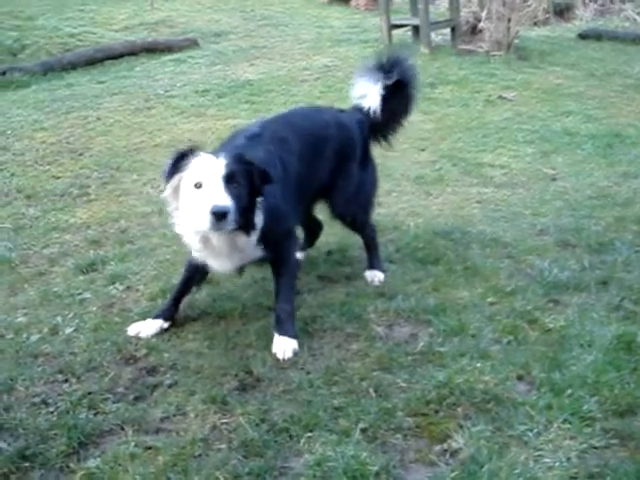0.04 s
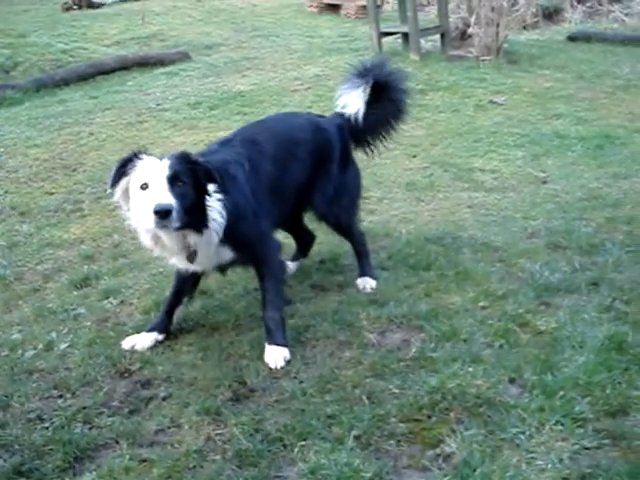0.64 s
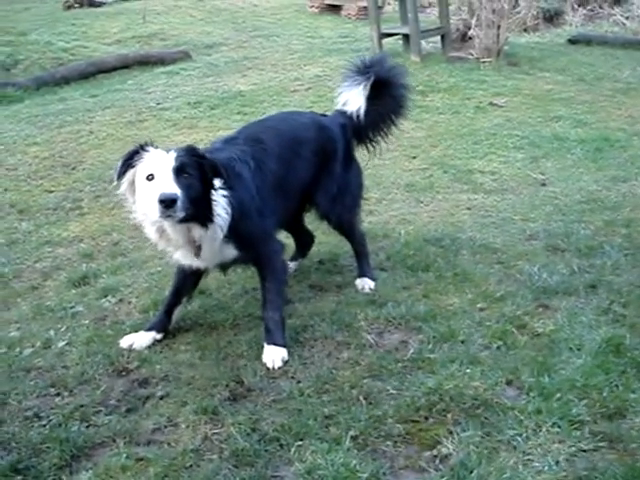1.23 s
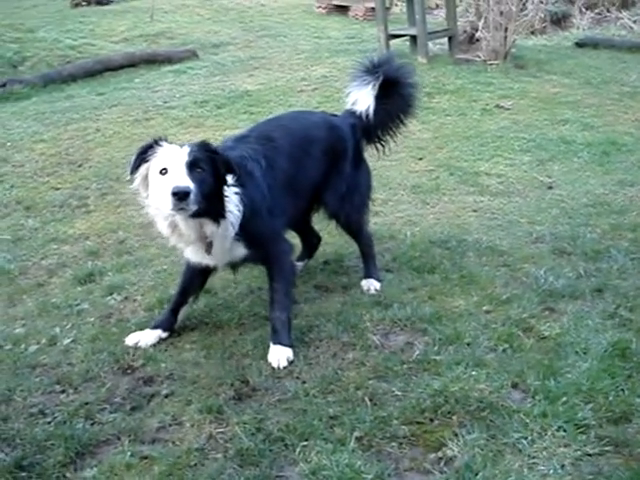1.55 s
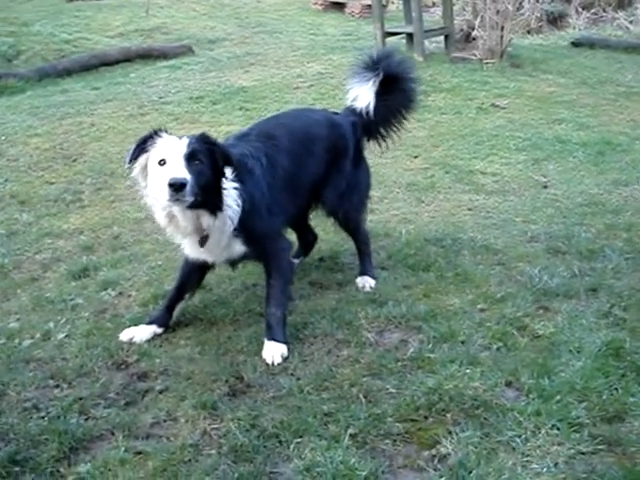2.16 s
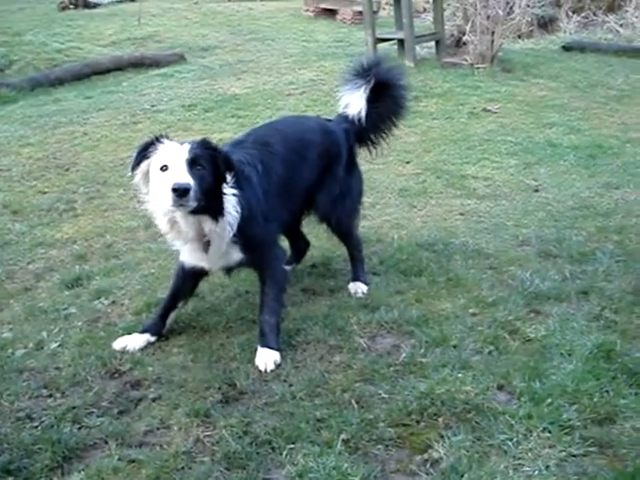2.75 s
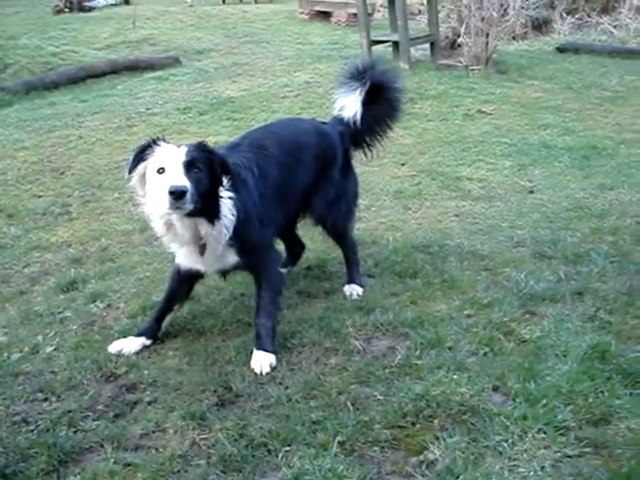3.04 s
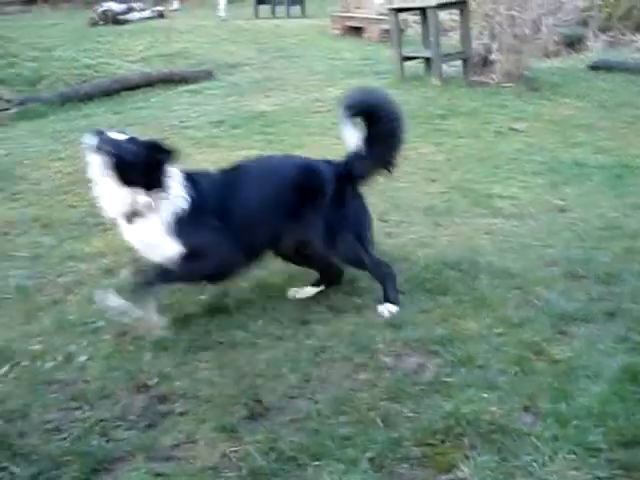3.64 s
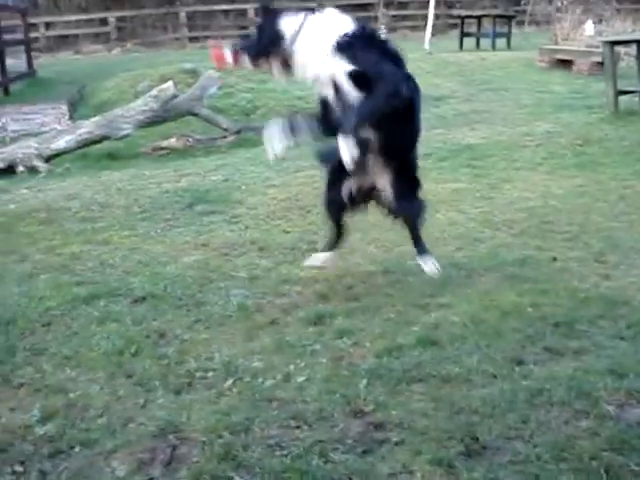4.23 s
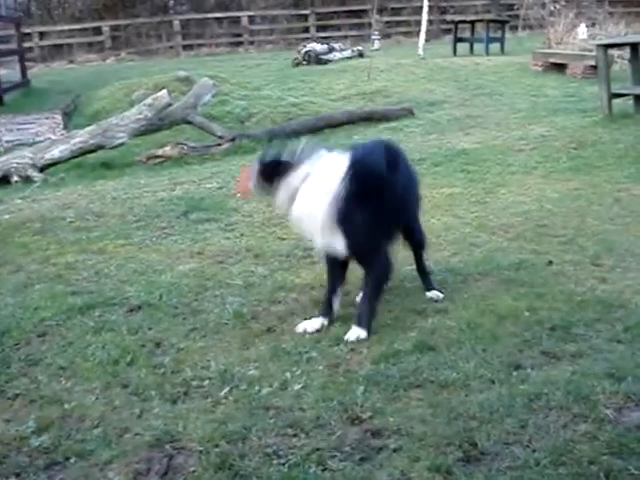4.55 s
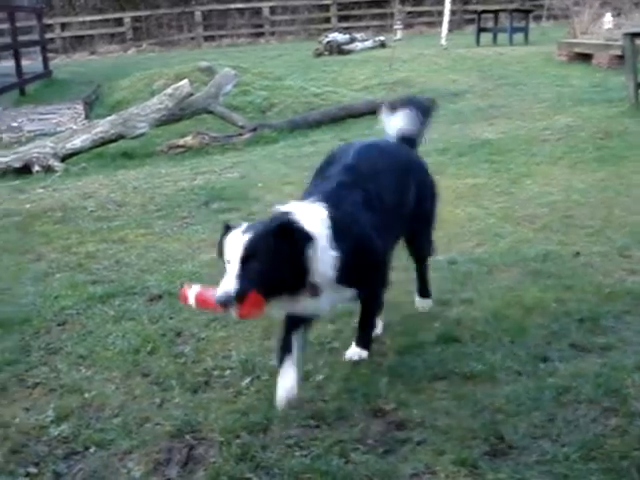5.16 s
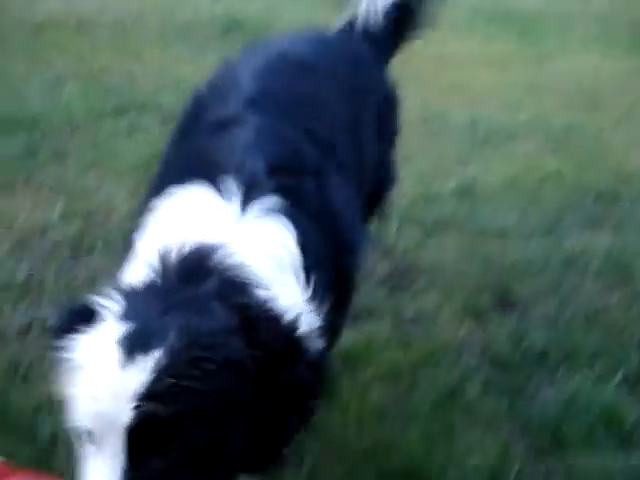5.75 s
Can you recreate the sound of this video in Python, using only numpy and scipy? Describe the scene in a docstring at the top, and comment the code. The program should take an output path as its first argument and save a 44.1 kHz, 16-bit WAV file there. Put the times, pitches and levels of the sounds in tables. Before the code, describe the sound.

A soft murmur of open garden air runs throughout, with a very faint, thin camera whine. A dog close by gives a tiny grunt at the start and snaps its jaws with a sharp clack at about 0.6 seconds. Light scuffs of paws on grass and a few faint, short grunts follow, then a second snap at 2.9 seconds. From 3.4 seconds a sleeve rustles softly, with more scuffs and some small rubbery clicks. At 4.2 seconds a rubber toy slaps into the dog's mouth with a dull thud and at once gives a shrill squeak. The dog chews: a sharp click at 4.7, a weak squeak at 4.8, then loud ones at 5.2 and 5.7 seconds. Each is followed by a lower, falling squeak as the toy refills. The garden echoes faintly, and the last squeaks sound closest, ending at about 6 seconds.

```python
"""On a garden lawn, a dog grunts, snaps its jaws twice, then leaps for a thrown rubber toy and chews it.
Teeth, paws and rubber make impacts that decay exponentially. Each bite drives air out through the toy's
reed, whose harmonics excite the shell and pipe in a shrill squeak; as the toy refills, the reed sounds
lower and falls. The garden reflects the sounds faintly, over a murmur of open air, the rustle of the
thrower's sleeve and the thin whine of a small camera."""
import sys
import numpy as np
from scipy import signal
from scipy.fft import rfft, irfft, next_fast_len
from scipy.io import wavfile
from scipy.ndimage import map_coordinates

SR = 44100
rng = np.random.default_rng(int(sys.argv[2]) if len(sys.argv) > 2 else 0)


def file_out(sig):
    """Save sig as 16-bit WAV at sys.argv[1]."""
    # one column per channel
    cols = np.atleast_2d(sig).T
    # limit, then scale
    lim = np.clip(cols, -1, 1)
    pcm = np.round(lim * 32767).astype(np.int16)
    wavfile.write(sys.argv[1], SR, pcm)


N = 264600
BAND_LIMIT_HZ = 10020


def amp(db):
    return 10 ** (np.asarray(db) / 20)


def unit(x):
    return x / np.sqrt(np.mean(x ** 2) + 1e-20)


def along(points, hz):
    """Interpolation of (f/Hz, value) points on a logarithmic frequency axis."""
    f, values = np.transpose(points)
    return np.interp(np.log(hz + 1), np.log(f + 1), values)


def curves(rows, t):
    """Linear interpolation of each column of a table at the times t."""
    times, *columns = np.transpose(rows)
    return [np.interp(t, times, column) for column in columns]


def wobble(rate, size):
    """Smooth random modulation: a spline through `rate` Gaussian knots a second."""
    knots = rng.standard_normal(int(size * rate / SR) + 4)
    return map_coordinates(knots, [np.arange(size) * rate / SR])


def filtered(x, response):
    """Linear filtering: the spectrum of x times a frequency response."""
    size = next_fast_len(len(x) + 8192)
    return irfft(rfft(x, size) * response(np.fft.rfftfreq(size, 1 / SR)), size)[:len(x)]


def noise(spectrum, size):
    """Noise of unit rms, shaped by (f/Hz, level/dB) points."""
    return unit(filtered(rng.standard_normal(size), lambda hz: amp(along(spectrum, hz))))


def resonate(x, modes):
    """Superposition of resonances (f/Hz, bandwidth/Hz, level/dB) of alternating sign, driven by x."""
    return filtered(x, lambda f: sum(
        (-1) ** k * amp(db) * 1j * f * width / (hz * hz - f * f + 1j * f * width)
        for k, (hz, width, db) in enumerate(modes)))


def decay(t, t60, attack):
    """Damping: a quick rise from t = 0 and an exponential fall of 60 dB in t60 seconds."""
    t = np.maximum(t, 0)
    return 1000. ** (-t / t60) * (1 - np.exp(-t / attack))


def add(track, s, sound):
    """Superpose a sound on the track from s seconds."""
    start = max(round(s * SR), 0)
    track[start:start + len(sound)] += sound[:N - start]


def background_shift(start_s=4.17, length_s=0.07):
    """A ramp from 0 to 1 as the squeaking starts."""
    return np.clip((np.arange(N) / SR - start_s) / length_s, 0, 1)


# Spectra of the open air: f/Hz, level/dB
MURMUR_SPECTRUM = [(71, -54), (120, 1), (179, -3.5), (214, -3.5), (287, -7.5), (372, -10), (616, -15),
                   (780, -12.5), (1180, -15.5), (1360, -22), (2000, -29), (2600, -52), (4400, -120)]
RUMBLE_SPECTRUM = [(15, -48), (25, -23), (59, 0.5), (100, 3), (130, -33), (220, -120)]
HISS_SPECTRUM = [(880, 1), (1500, -1.5), (2900, -3.5), (4180, -4), (6360, -9.5), (7760, -8.5),
                 (8400, -12.5), (10000, -14.5), (13000, -44), (22000, -120)]

def open_air():
    """Ambient noise in three bands: at the first squeak murmur and rumble sink; the hiss rises a little."""
    shift = background_shift()
    murmur = amp(-46 - 9 * shift + wobble(9, N)) * noise(MURMUR_SPECTRUM, N)
    rumble = amp(-57.5 - 19 * shift + 1.4 * wobble(3.02, N)) * noise(RUMBLE_SPECTRUM, N)
    hiss = amp(-52.5 + 1.1 * shift) * noise(HISS_SPECTRUM, N)
    return murmur + rumble + hiss


# The camera's tone: f/Hz, level/dB
WHINE_TONE = [(7590, -68)]

def camera_whine():
    """A sinusoid under slight random frequency modulation; it sinks with the murmur."""
    hz, db = WHINE_TONE[0]
    phase = 2 * np.pi * np.cumsum(hz + 12 * wobble(120, N)) / SR
    return amp(db - 9 * background_shift()) * np.sqrt(2) * np.sin(phase)


# The waiting dog's grunts: midpoint t/s, level/dB, f/Hz, duration/s
GRUNT_NOTES = [(0.031, -40.5, 364, 0.061), (1.974, -40.5, 384.3, 0.043), (2.312, -47, 404.5, 0.044),
               (2.869, -40.5, 359, .03), (3.391, -48.5, 365, 0.063)]

def grunts():
    """Irregular vibration in the throat: three harmonics made hoarse by pitch jitter."""
    out = np.zeros(N)
    for s, db, hz, length in GRUNT_NOTES:
        size = int(length * SR)
        phase = 2 * np.pi * np.cumsum(hz * (1 + 0.112 * wobble(171, size))) / SR
        voice = unit(np.sin(phase) + 0.41 * np.sin(2 * phase) + 0.26 * np.sin(3 * phase))
        add(out, s - length / 2, 1.33 * amp(db) * voice * np.hanning(size))
    return out


# Reverberation time of the garden: f/Hz, T60/s
GARDEN_T60 = [(200, 0.33), (1200, 0.56), (3500, 0.59), (6300, 0.93), (10000, 0.23)]

def garden_echo(x, wet_db, treble_db, wall_db, wall_s):
    """Reflection: one delayed echo from a wall, and diffuse scattering from fences and bushes."""
    hz, t, bands = signal.stft(rng.standard_normal(SR // 2), SR, nperseg=256)
    tail = signal.istft(bands * decay(t, along(GARDEN_T60, hz)[:, None], 0.0047), SR, nperseg=256)[1]
    colour = [(200, 14), (1200, 5.5), (2200, 0), (3400, -7.5), (6000, treble_db), (10000, treble_db - 24.5)]
    tail = filtered(tail, lambda f: amp(along(colour, f)))
    diffuse = signal.fftconvolve(x, tail / np.linalg.norm(tail))[:N]
    wall = filtered(x, lambda f: np.exp(-2j * np.pi * f * wall_s))
    return amp(wet_db) * diffuse + amp(wall_db) * wall


# Jaw closures: t/s, level/dB, relative cavity level/dB, delay of the back teeth/s
JAW_CLOSURES = [(.649, -6, 3.5, 0.0027), (2.9138, -7, 4.5, 0.0032)]
# Modes of the teeth: f/Hz, bandwidth/Hz, level/dB
TOOTH_MODES = [(2380, 1040, -8), (3340, 480, 1), (4040, 260, -10.5), (4600, 230, -7), (7200, 870, -25)]
# Spectra of the teeth's clack and of the mouth cavity: f/Hz, level/dB
CLACK_SPECTRUM = [(500, -18), (850, -16), (1200, -9.5), (1670, -29), (2550, -10.5), (3360, -0.5),
                  (4310, -12.5), (5420, -16), (8370, -17), (8750, -31), (9480, -16.5), (10000, -31),
                  (13000, -64), (22000, -120)]
MOUTH_SPECTRUM = [(80, -37), (150, -14), (300, 0.5), (400, -3), (490, 2), (630, -5), (780, 2.5),
                  (1000, -1.5), (1320, 1.5), (1650, -7.5), (1920, 3), (2300, -17), (3200, -17), (6000, -70)]

def jaw_snaps():
    """Impact excitation: lips, front teeth, back teeth and jowls meet in turn; the mouth resonates."""
    out, t = np.zeros(N), np.arange(-SR // 200, SR // 4) / SR
    for s, db, cavity_db, gap in JAW_CLOSURES:
        lips = 0.11 * decay(t + 0.0015, 0.033, 0.0011)
        front = 1.28 * decay(t, 0.04, 0.00033)
        back = decay(t - gap, 0.033, 0.0011)
        jowls = 0.17 * decay(t - 0.012, 0.075, 0.003)
        contacts = lips + front + back + jowls
        teeth = amp(-10.5) * unit(resonate(rng.standard_normal(len(t)), TOOTH_MODES)) * contacts
        clack = amp(-12.5) * noise(CLACK_SPECTRUM, len(t)) * contacts
        mouth = amp(cavity_db - 13) * noise(MOUTH_SPECTRUM, len(t)) * decay(t, 0.086, 0.0039)
        add(out, s + t[0], amp(db) * (teeth + clack + mouth))
    return out


# The recorder's low thumps: t/s, level/dB
RECORDER_THUMPS = [(0.648, -29.5), (2.916, -28), (3.942, -27), (4.165, -30), (4.222, -28)]

def recorder_thumps():
    """A decaying offset step: the recorder gives a dull, low thump under the sharpest sounds."""
    out, t = np.zeros(N), np.arange(SR // 4) / SR
    for s, db in RECORDER_THUMPS:
        add(out, s, amp(db) * decay(t, 0.093, 0.00029))
    return out


# Contacts of paws and lips: t/s, level/dB, T60/s, centre f/Hz
SCUFF_CONTACTS = [(1.080, -30.5, 0.027, 2200), (1.541, -29.5, 0.052, 890), (1.971, -30.5, .065, 1920),
                  (2.074, -34, 0.035, 795), (2.851, -31, 0.049, 4050), (3.102, -25, 0.079, 1050),
                  (3.45, -26.5, 0.13, 1240), (3.490, -16.5, 0.011, 1530), (3.496, -36, .08, 1300),
                  (3.836, -28, 0.032, 1100), (4.178, -32, 0.24, 2470), (4.628, -30, 0.053, 910),
                  (5.105, -19, 0.023, 1320), (5.86, -42, 0.24, 600)]
# Their spectrum: f/centre, level/dB
SCUFF_SPECTRUM = [(.1, -32), (.3, -3.5), (.6, 2.5), (1, 3), (1.6, -4), (3, -8), (6, -25), (12, -34.5)]

def scuffs():
    """Friction noise: paws brush the grass and lips smack in gritty, damped bursts."""
    out, t = np.zeros(N), np.arange(SR // 4) / SR
    for s, db, t60, centre_hz in SCUFF_CONTACTS:
        colour = [(multiple * centre_hz, level) for multiple, level in SCUFF_SPECTRUM]
        grit = unit(noise(colour, len(t)) * amp(1.5 * wobble(600, len(t))))
        add(out, s, amp(db - 5.5) * grit * decay(t, t60, 0.00043))
    return out


# Light squeezes: midpoint t/s, level/dB, f/Hz, duration/s
AIR_WISPS = [(3.415, -43, 6340, 0.052), (3.797, -44, 7050, 0.044), (3.957, -45, 7200, 0.038),
             (4.396, -34, 6700, 0.039), (5.379, -24, 6100, 0.028)]

def pipe_wisps():
    """Pipe resonance: a flow too weak to sound the reed gives only a narrow band of hiss."""
    out = np.zeros(N)
    for s, db, hz, length in AIR_WISPS:
        size = int(length * SR)
        pipe = [(hz, 700, 0)]
        hiss = resonate(resonate(rng.standard_normal(size), pipe), pipe)
        add(out, s - length / 2, amp(db) * unit(hiss) * np.hanning(size))
    return out


# The swing of the throw: t/s, level/dB
SLEEVE_SWING = [(3.44, -46.5), (3.59, -49.5), (3.858, -52), (3.984, -48.5), (4.13, -47.5)]
# Spectrum of the cloth: f/Hz, level/dB
CLOTH_SPECTRUM = [(880, -10), (1500, 0), (2530, -0.5), (5130, -1.5), (5560, 0), (6890, -1.5), (9310, -3),
                  (10000, -5), (13000, -38), (22000, -120)]

def sleeve():
    """Friction of cloth: the swinging sleeve makes noise, amplitude-modulated by its folds."""
    t = np.arange(N) / SR
    fade = np.clip(np.minimum(t - SLEEVE_SWING[0][0], SLEEVE_SWING[-1][0] - t) / 0.049, 0, 1)
    folds = amp(2 * wobble(70, N))
    return fade * amp(curves(SLEEVE_SWING, t)[0]) * unit(noise(CLOTH_SPECTRUM, N) * folds)


# Grips on the toy: t/s, level/dB, relative pipe level/dB
GRIP_CLICKS = [(3.7458, -16, -6), (3.7504, -22.5, -3), (3.8947, -27, -20), (3.9392, -25, 9),
               (3.9722, -19.5, -9), (4.0003, -37.5, 8.5), (4.382, -16, 1.5), (4.68, -20, -32),
               (4.713, -9, -7), (5.8217, -27, -29)]
# Spectrum of the shell's tick: f/Hz, level/dB
TICK_SPECTRUM = [(470, -62), (800, -27), (1940, -15), (2350, -17.5), (2900, 2.5), (3660, -11.5), (4120, -1),
                 (5360, -0.5), (7130, -6.5), (8900, -11), (10000, -10.5), (13000, -46), (22000, -120)]

def shell_clicks():
    """Transient response: the shell ticks under the grip, and a wisp of air rings the pipe."""
    out, t = np.zeros(N), np.arange(SR // 5) / SR
    for s, db, ring_db in GRIP_CLICKS:
        tick = noise(TICK_SPECTRUM, len(t)) * decay(t, 0.03, 0.00081)
        ring = unit(resonate(rng.standard_normal(len(t)), [(7050, 120, 0)])) * decay(t, 0.031, 0.00081)
        add(out, s, amp(db - 5.5) * (tick + amp(ring_db + 4) * ring))
    return out


# The toy striking the mouth: t/s, level/dB, relative thud level/dB
CATCH_IMPACTS = [(4.1622, -20, -1.5), (4.165, -7, -12), (4.170, -12.5, -5.5), (4.2029, -13, -2.5),
                 (4.214, -26, -1)]
# Spectra of the slap and the thud: f/Hz, level/dB
SLAP_SPECTRUM = [(530, -60), (900, -20), (1610, -12), (1900, -5.5), (2730, 2), (3020, -6), (3960, 0.5),
                 (4700, -9), (5570, -7.5), (10000, -18.5), (13000, -55), (22000, -120)]
THUD_SPECTRUM = [(59, -49), (100, -22), (182, -2.5), (248, -19), (389, 2), (520, -3.5), (620, -15),
                 (1090, -5), (1240, -13), (1500, -6.5), (1950, -30), (3300, -120)]

def catch():
    """Damped impacts: rubber slaps into the mouth and thuds as the jaws close on it."""
    out, t = np.zeros(N), np.arange(SR // 4) / SR
    for s, db, thud_db in CATCH_IMPACTS:
        slap = noise(SLAP_SPECTRUM, len(t)) * decay(t, 0.033, 0.00023)
        thud = noise(THUD_SPECTRUM, len(t)) * decay(t, 0.099, 0.00045)
        add(out, s, amp(db - 5) * (slap + amp(thud_db - 1.5) * thud))
    return out


def register_levels(tone_db, fundamental_db, whistle_db, top_db):
    """Levels of fundamental, overtones, whistle and top; the first two share the tone's power."""
    overtones_db = tone_db - 10 * np.log10(1 + amp(fundamental_db) ** 2)
    return [overtones_db + fundamental_db, overtones_db, whistle_db, whistle_db - top_db]


# Response of shell and pipe, and spectrum of the air jet at the reed: f/Hz, level/dB
TOY_RESPONSE = [(1000, 23.5), (1950, 3.5), (2900, 7.5), (3900, 6.5), (4800, 3.5), (5500, 5), (6300, 6.5),
                (7100, -0.5), (8000, -5), (8800, -3), (10000, -14)]
JET_SPECTRUM = [(200, -24), (400, -10.5), (560, -5), (800, -12.5), (1500, -7.5), (3500, -8.5), (5000, -0.5),
                (6300, -4.5), (7300, 8), (10000, -11.5)]
# Lower edges of the pipe whistle and of the top register: f/Hz
REGISTER_EDGES = [5200, 7300]

def reed(pitch, levels, jitter, flutter_db, air_db, stall_hz=880, count=14):
    """Source and filter: the harmonics of a buzzing reed sweep through the toy's resonances."""
    size = len(pitch)
    t = np.arange(size) / SR
    # as the flow dies and the pitch sags, the oscillation turns irregular
    unsteady = jitter + 0.047 * np.clip((stall_hz - pitch) / 100, 0, 1)
    pitch = pitch * (1 + unsteady * wobble(700, size) + 0.00277 * wobble(58, size))
    phase = 2 * np.pi * np.cumsum(pitch) / SR
    k = np.arange(1, count + 1)[:, None]
    hz = k * pitch
    # lips and teeth shade the opening, so each harmonic swells and fades on its own
    shading_db = 3 * np.array([wobble(41.4, size) for _ in k])
    weight = amp(along(TOY_RESPONSE, hz) + shading_db) ** 2 * (hz < BAND_LIMIT_HZ + 500)
    # each register shares its power among the harmonics inside it
    overtone = k > 1
    high, top = [overtone / (1 + np.exp((edge - hz) / 120)) for edge in REGISTER_EDGES]
    registers = [k == 1, overtone - high, high - top, top]
    power = sum(amp(db) ** 2 * band * weight / (np.sum(band * weight, axis=0) + 1e-6)
                for db, band in zip(levels, registers))
    # uneven beating: the tone shimmers, and high harmonics flutter and slip in phase
    depth = np.minimum(hz / 6000, 1)
    flutter = amp(flutter_db * depth * np.array([wobble(596, size) for _ in k]))
    slip = rng.uniform(0, np.pi, (count, 1)) + 0.74 * depth * np.array([wobble(218.5, size) for _ in k])
    shimmer = 1 + 0.1 * wobble(450, size)
    tone = shimmer * np.sum(np.sqrt(2 * power) * flutter * np.cos(k * phase + slip), axis=0)
    # the jet pulses with the reed, in proportion to the overtones
    jet = noise(JET_SPECTRUM, size) * (1 + 0.77 * np.cos(phase))
    air = amp(air_db) * np.sqrt(power[1:].sum(axis=0)) * jet
    fade = np.clip(np.minimum(t, t[-1] - t) / 0.0058, 0, 1)
    return (tone + air) * fade


# Outflow, one curve a bite: t/s, f/Hz, tone level/dB, whistle level/dB
BITE_CURVES = [
    [(4.215, 1162, -20, -30), (4.221, 1147, -20.5, -16.5), (4.241, 1410, -29.5, -17.5),
     (4.247, 1547, -23, -17), (4.255, 1535, -26.5, -19.5), (4.267, 1333, -22, -20), (4.285, 1333, -27, -18),
     (4.317, 1098, -27.5, -22.5), (4.378, 948, -42.5, -37.5)],
    [(4.828, 977.7, -48, -62), (4.834, 1007, -37, -39), (4.84, 1020, -38.5, -34), (4.864, 985, -39, -41.5),
     (4.878, 1007, -46, -39), (4.894, 990, -55, -49), (4.898, 990, -37, -51)],
    [(5.185, 1013, -22, -42), (5.191, 1047, -28.5, -29.5), (5.205, 1090, -24, -23.5),
     (5.235, 1121, -20, -17), (5.281, 1182, -23.5, -17.5), (5.325, 1271, -27.5, -17.5),
     (5.345, 1212, -28, -18.5), (5.361, 1010, -27, -25), (5.374, 926, -58, -27.5)],
    [(5.711, 1032, -42, -48), (5.715, 1036, -26.5, -24.5), (5.721, 1081, -21.5, -13.5),
     (5.735, 1066, -22.5, -26), (5.781, 1078, -18, -17.5), (5.805, 1062, -22, -22),
     (5.821, 920, -36.5, -30), (5.826, 970, -43, -40)],
]
# Timbre of each: fundamental over overtones/dB, top under whistle/dB, relative jitter, flutter/dB
BITE_TIMBRES = [(-5.5, 13.5, 0.03, 3.5), (-1, 19, 0.01, 3.8), (-2.5, 13, 0, 2.5), (-0.5, 12.5, 0, 3)]

def bites():
    """Flow-driven oscillation: jaw pressure forces air out through the reed in a rough shriek."""
    out = np.zeros(N)
    for rows, (fundamental_db, top_db, jitter, flutter_db) in zip(BITE_CURVES, BITE_TIMBRES):
        t = np.arange(rows[0][0], rows[-1][0], 1 / SR)
        pitch, tone_db, whistle_db = curves(rows, t)
        levels = register_levels(tone_db, fundamental_db, whistle_db, top_db)
        add(out, t[0], reed(pitch, levels, jitter, flutter_db, air_db=-20))
    return out


# Shifts of the grip: t/s, depth/dB, half-width/s
GRIP_CHOKES = [(4.322, 9.5, 0.0038), (5.286, 8, 0.0039), (5.536, 5, 0.0055)]

def choke_gain():
    """Throttling: the squeak dips briefly where the jaws pinch off the air."""
    t = np.arange(N) / SR
    return amp(-sum(depth_db * np.exp(-((t - s) / half) ** 2) for s, depth_db, half in GRIP_CHOKES))


# Inflow, one curve a refill: t/s, f/Hz, tone level/dB
REFILL_CURVES = [
    [(4.549, 876, -57), (4.553, 892.4, -38), (4.561, 934, -33.5), (4.591, 940, -31), (4.609, 907.4, -33.5),
     (4.635, 794, -35.5), (4.666, 715, -52)],
    [(4.901, 820, -55), (4.911, 882, -35.5), (4.929, 959, -28), (4.953, 958, -29.5), (5.005, 847, -36.5),
     (5.047, 864, -36.5), (5.071, 829, -36.5), (5.097, 759, -38), (5.105, 751.4, -34)],
    [(5.373, 880, -33), (5.383, 941.7, -24.5), (5.403, 990, -22), (5.499, 936, -24), (5.523, 902, -24),
     (5.535, 864, -28.5), (5.569, 810, -28.5), (5.59, 700, -43)],
    [(5.832, 825.4, -47), (5.84, 875, -22.5), (5.856, 973, -21), (5.876, 993, -17), (5.91, 960, -19),
     (5.946, 872, -24), (5.98, 786, -24.5), (5.992, 747.9, -29), (5.999, 715, -24)],
]
# Timbre of each: fundamental over overtones/dB, initial whistle over tone/dB, dulling/(dB/s), air/dB
REFILL_TIMBRES = [(7.5, -17.5, 10, -13.5), (0, -15, -31, -12), (2, -8.5, 49, -13), (1, -10, 26, -11)]

def refills():
    """Elastic recovery: the rubber springs back and draws air past the reed; suction builds, then ebbs."""
    out = np.zeros(N)
    for rows, (fundamental_db, start_db, dull_db_per_s, air_db) in zip(REFILL_CURVES, REFILL_TIMBRES):
        t = np.arange(rows[0][0], rows[-1][0], 1 / SR)
        pitch, tone_db = curves(rows, t)
        whistle_db = tone_db + start_db - dull_db_per_s * (t - t[0])
        levels = register_levels(tone_db, fundamental_db, whistle_db, top_db=1)
        add(out, t[0], reed(pitch, levels, jitter=0.0027, flutter_db=2.7, air_db=air_db))
    return out


# Relative strength of the toy's echo, less when the dog is near: t/s, level/dB
TOY_ECHO_LEVEL = [(4.2, 1), (4.9, 3), (5.3, 4.5), (5.8, -8)]

def scene():
    """Superposition of the dog, the toy, their reflections and the background."""
    dog = jaw_snaps() + scuffs() + grunts()
    toy = choke_gain() * (bites() + refills()) + catch() + shell_clicks() + pipe_wisps()
    echo_gain = amp(curves(TOY_ECHO_LEVEL, np.arange(N) / SR)[0])
    dog_echo = garden_echo(dog, wet_db=-14, treble_db=-7, wall_db=-21.5, wall_s=0.045)
    toy_echo = garden_echo(toy * echo_gain, wet_db=-29.5, treble_db=9, wall_db=-20, wall_s=0.06)
    background = open_air() + camera_whine() + sleeve()
    return (dog + toy + dog_echo + toy_echo + recorder_thumps() + background)[None]


def record(dry):
    """Band limiting: a steep low-pass filter removes the highest treble."""
    return filtered(dry[0], lambda hz: 1 / np.sqrt(1 + (hz / BAND_LIMIT_HZ) ** 200))[None]


dry = scene()
out = record(dry)
file_out(out)
```